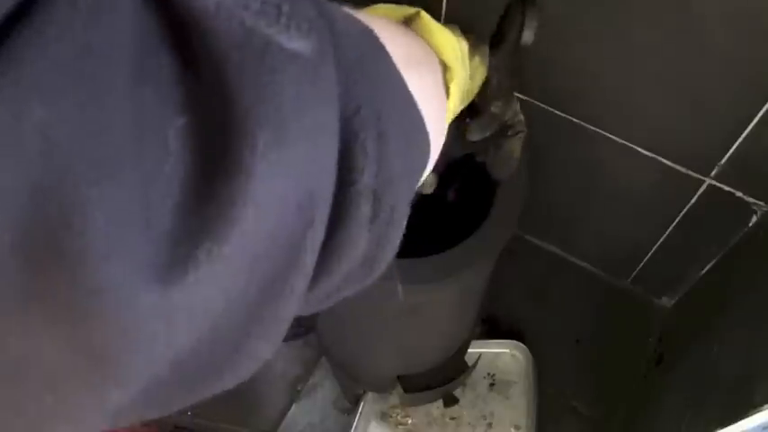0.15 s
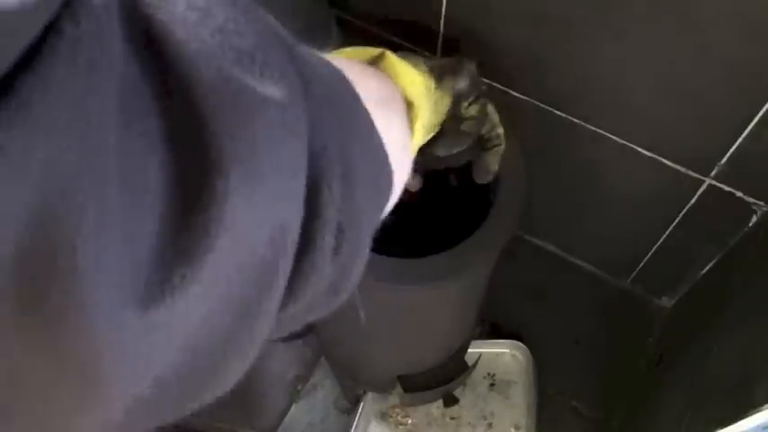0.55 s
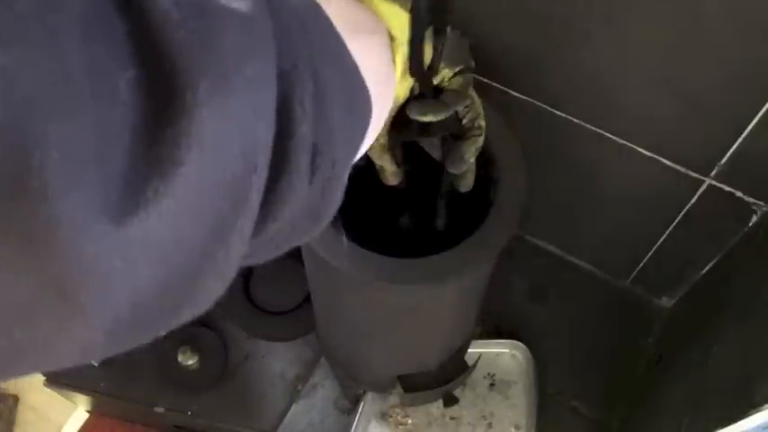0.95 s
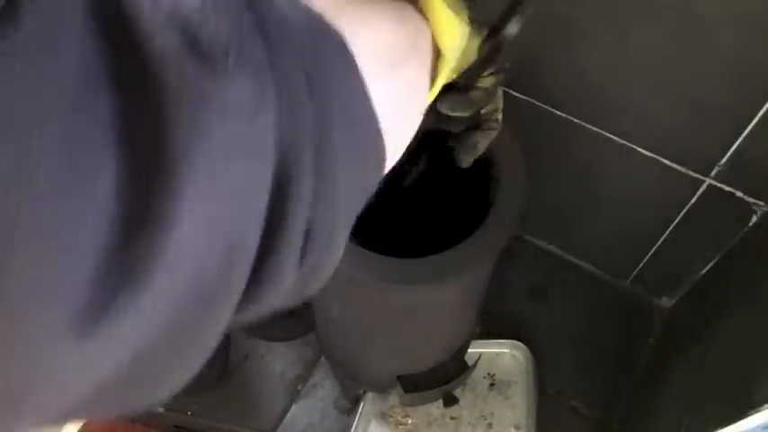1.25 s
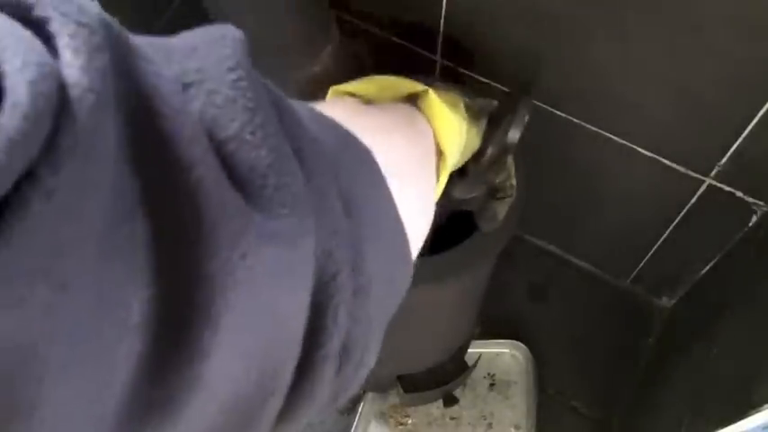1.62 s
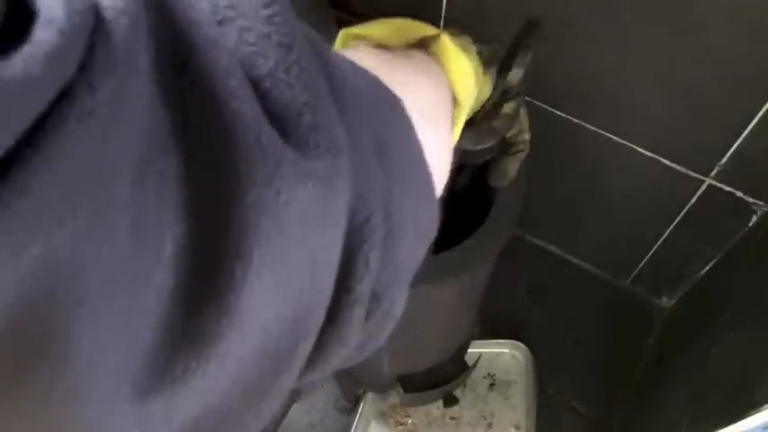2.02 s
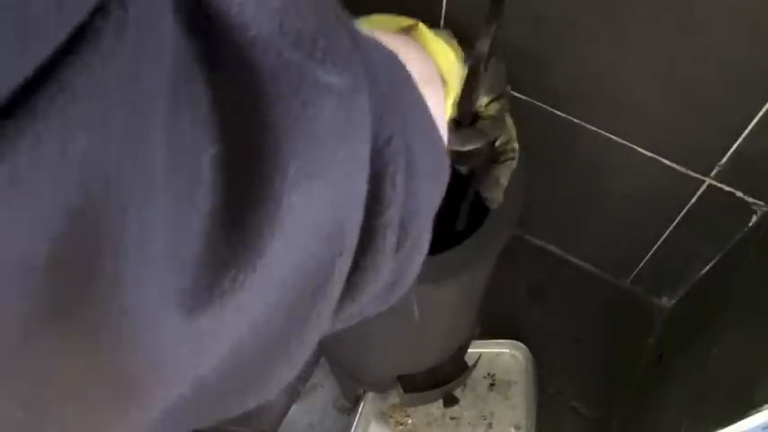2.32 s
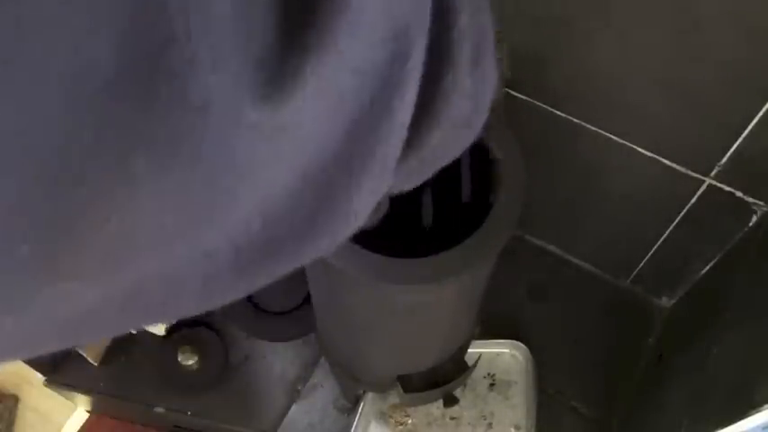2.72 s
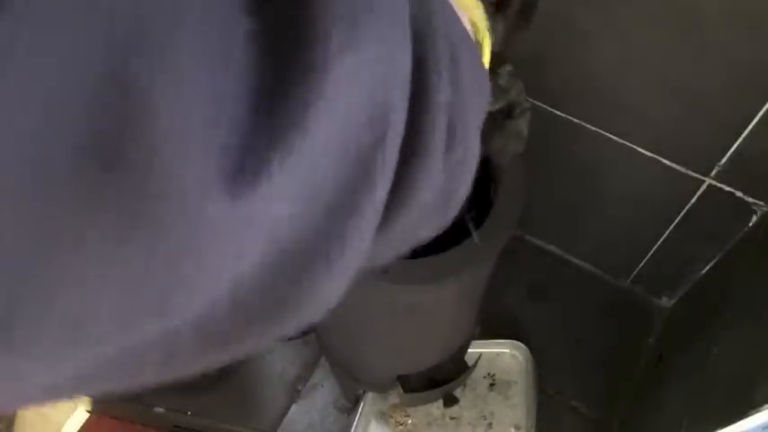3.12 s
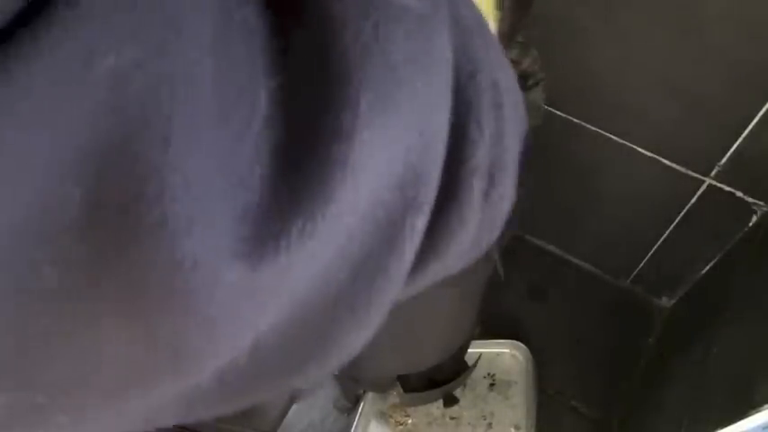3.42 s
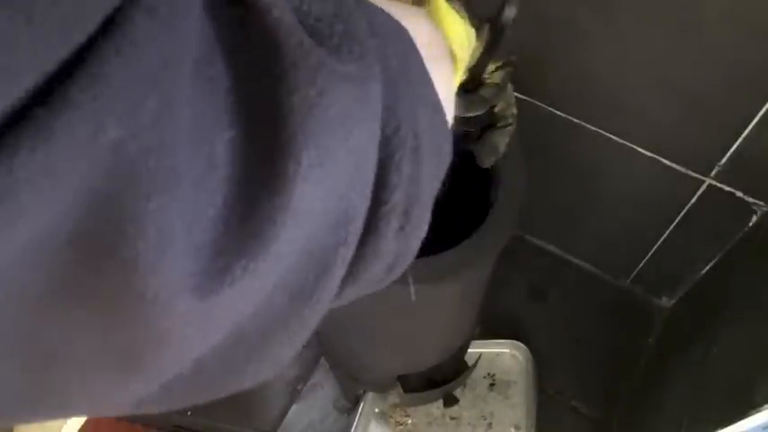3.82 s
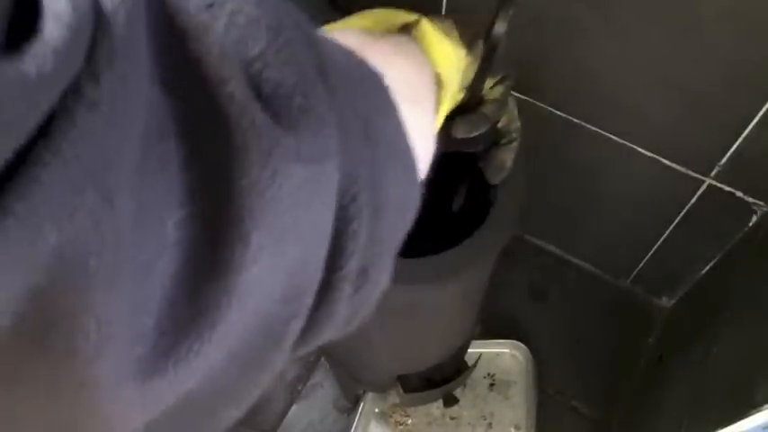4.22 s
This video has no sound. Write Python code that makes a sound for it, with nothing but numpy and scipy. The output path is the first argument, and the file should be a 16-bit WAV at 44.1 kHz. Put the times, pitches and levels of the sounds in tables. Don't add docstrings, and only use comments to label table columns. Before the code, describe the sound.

Close, dry metallic clanks and short gritty scrapes as ash is raked off a grate in a small round metal stove.

```python
import sys
import numpy as np
from scipy import signal
from scipy.fft import rfft, irfft, next_fast_len
from scipy.io import wavfile
from scipy.ndimage import uniform_filter1d, map_coordinates

SR = 44100
rng = np.random.default_rng(int(sys.argv[2]) if len(sys.argv) > 2 else 0)


def bounce(signal):
    frames = np.transpose(np.atleast_2d(signal))
    limited = np.clip(frames, -1, 1)
    pcm = np.round(limited * 32767).astype(np.int16)
    wavfile.write(sys.argv[1], SR, pcm)


def volts(x):
    e = np.asarray(x, float) / 20
    return 10 ** e


N = 192449


def unit(x):
    return x / np.sqrt(np.mean(x ** 2) + 1e-20)


def along(points, hz):
    f, v = np.transpose(points)
    return np.interp(np.log(hz + 1), np.log(f + 1), v)


def wobble(rate_hz):
    knots = rng.standard_normal(int(N * rate_hz / SR) + 4)
    return map_coordinates(knots, [np.arange(N) * rate_hz / SR])


def filtered(x, response):
    m = next_fast_len(N + SR // 2)
    return irfft(rfft(x, m) * response(np.fft.rfftfreq(m, 1 / SR)), m)[:N]


def causal(x, spectrum):
    size = 4096
    cepstrum = irfft(np.log(volts(along(spectrum, np.fft.rfftfreq(size, 1 / SR))) + 1e-6))
    cepstrum[1:size // 2] *= 2
    cepstrum[size // 2 + 1:] = 0
    kernel = irfft(np.exp(rfft(cepstrum)))
    return signal.fftconvolve(x, kernel / np.linalg.norm(kernel))[:len(x)]


def resonances(peaks):
    def response(f):
        total = 0
        for k, (hz, width_hz, db) in enumerate(peaks):
            loss = 1j * f * width_hz
            total = total + (-1) ** k * volts(db) * loss / (hz * hz - f * f + loss)
        return total
    return response


def mode_peaks(modes):
    return [(hz, 8.3 / t60_s, db) for hz, db, t60_s in modes]


def gritty(size, spiky_db):
    return unit(rng.standard_normal(size) * volts(spiky_db * np.minimum(rng.exponential(size=size), 3)))


def ringing(modes, t, scatter_db):
    hz, db, t60_s = np.transpose(modes)[:, :, None]
    strength, grip, detune = rng.standard_normal((3, len(modes), 1))
    t60_s = t60_s * np.exp(0.034 * grip)
    fade = volts(db + scatter_db * np.minimum(strength, .6) - 60 * t / t60_s)
    tones = fade * np.sin(2 * np.pi * hz * (1 + 0.0017 * detune) * t)
    return np.sum(tones, axis=0) * (1 - np.exp(-t / 0.00061))


# start_s, peak_db, grate_db (re peak), brightness_db, wash_db
BLOW_EVENTS = [(0.0212, -10, -29, -48, -1.5), (0.055, -1.5, -29, -23, -8), (0.1653, -5, -22, -16.5, -6),
               (0.3002, -37.5, -1, -27, -3), (0.4284, -50, 14, -13, -11), (0.5265, 3, -26.5, -23, -6.5),
               (0.8582, -23, -28, -0.5, -21), (1.2631, -1.5, -22.5, -13, -0.5),
               (1.3163, -10.5, -13.5, -22, 2), (1.427, -10.5, -17, -83, 0), (1.623, -5, -19.5, -2.5, -2.5),
               (1.86, -34.5, 4, -19, -12), (2.1101, -8, -14, -65, -1), (2.207, -3, -20, -4, -4.5),
               (2.3043, -7.5, -19, -19, 0), (2.3338, -12, -14.5, -28, 4), (2.724, -19.5, -0.5, -42, 0),
               (2.7442, -2, -17.5, -16.5, -4.5), (2.8344, -17.5, -3.5, -49, 5.5),
               (2.8596, -24.5, -8, -40, 6), (3.5726, 2, -25, -7.5, -9), (3.7752, -17.5, -11.5, -18, 4.5),
               (4.0781, -30, -9, -18, 0.5), (4.3246, -15.5, -17, -4.5, -5)]
# start_s, peak_db, grate_db (re peak)
CATCH_EVENTS = [(0.1361, -29.5, 2), (0.5891, -14, -11), (0.623, -9, -41), (0.6574, -13.5, -21),
                (0.7116, -24, -22), (0.9445, -26, -24), (0.9657, -11.5, -18), (1.0201, -16, -21),
                (1.1815, -22.5, -8), (1.732, -21, -10.5), (1.7395, -22.5, -17), (1.8002, -22, -20),
                (1.8751, -37, -2), (1.926, -25.5, -38), (2.0026, -16.5, -15), (2.3795, -17.5, -3.5),
                (2.4396, -25.5, -20), (2.5577, -34.5, -23.5), (3.0307, -37, -4), (3.1268, -31, 3.5),
                (3.2367, -22, -10.5), (3.2844, -32, -3.5), (3.6494, -29, -3), (3.6901, -20, -5),
                (3.7305, -23.5, -12), (3.8544, -31, 4), (3.8791, -27, 0)]
# start_s, level_db
TICK_EVENTS = [(0.0561, 3.5), (0.1662, 1), (0.5277, 6), (0.5323, 2.5), (.635, -5.5), (0.688, -10),
               (.726, -6), (2.1136, -5), (2.337, -4.5), (2.3852, -8.5), (2.3955, -14), (3.082, -26),
               (1.2668, 3.5), (1.2879, -6), (1.3217, -7), (1.6234, 1), (2.7485, -4.5), (2.7508, 0.5),
               (2.754, 0), (3.5762, 4.5), (3.5783, 1), (3.583, -1)]
# pitch_hz, level_db, t60_s
GRATE_MODES = [(724, 3.5, 0.28), (758, -5, 0.72), (795, -3.5, 0.33), (1037, -6, 0.37), (1042, -1.5, 0.13),
               (1201, -5.5, 0.39), (1364, -20, 0.26), (1432, -6, 0.62), (1517, 0.5, 0.26), (1526, -1, 0.28),
               (1753, -1, 0.27), (1900, -3.5, 0.31)]
# pitch_hz, level_db, t60_s
TONG_MODES = [(1900, -20, 0.5), (2175, -4.5, 0.39), (2608, 1.5, 0.19), (2700, -1.5, 0.14),
              (2832, -0.5, 0.22), (3000, -17, 0.36), (3172, -0.5, 0.22), (3400, -1, 0.23),
              (3575, -9.5, 0.28), (3974, 1, 0.13), (4100, 0, 0.16), (4380, -7, 0.081), (4410, -39, 0.145),
              (4780, -9, 0.04), (5000, -18.5, 0.63), (5410, -3, 0.11), (5300, -7, 0.14),
              (6450, -21.5, 0.26), (7100, -4, 0.18)]
# freq_hz, density_db_per_hz
CRACK_SPECTRUM = [(300, -120), (1000, -87), (2000, -1.5), (3200, 9.5), (4600, 7.5), (6000, 2.5),
                  (9000, -16.5), (16000, -44.5)]
# freq_hz, density_db_per_hz
EDGE_SPECTRUM = [(2500, -19), (5000, -1), (7000, -0.5), (10000, -5.5), (13000, -11.5), (16000, -38)]
# freq_hz, density_db_per_hz
RASP_SPECTRUM = [(300, -7.5), (650, -6.5), (1050, -1), (1600, 6), (2300, -5), (4000, -70)]


def knocks():
    blow_rise, catch_rise = 0.15, 0.9
    catch_bright_db, catch_wash_db = -0.5, -0.8
    chatter_s, grate_s_per_db, dull_s_per_db = 0.012, 0.00019, 0.00014
    t = np.arange(SR // 2) / SR
    crack, edge, rasp, ring, loose = np.zeros((5, N + SR))
    contacts = [(*row, blow_rise) for row in BLOW_EVENTS]
    contacts += [(*row, catch_bright_db, catch_wash_db, catch_rise) for row in CATCH_EVENTS]
    for start_s, db, grate_db, bright_db, wash_db, rise in sorted(contacts):
        start = round(start_s * SR)
        at = slice(start, start + len(t))
        decay_s = max((chatter_s + grate_s_per_db * grate_db - dull_s_per_db * bright_db) / 3, .0005)
        burst = gritty(len(t), spiky_db=2.5) * np.exp(-t / decay_s) * (1 - np.exp(-t / (rise * decay_s)))
        burst[30] += 0.032 / decay_s ** 0.65 * blow_rise / rise
        crack[at] += volts(db - 10.5) * burst
        edge[at] += volts(db + bright_db - 3.5) * burst
        rasp[at] += volts(db + grate_db + 0.5) * burst
        ring[at] += volts(db + grate_db - 12.5) * ringing(GRATE_MODES, t, scatter_db=4.5)
        ring[at] += volts(db + wash_db - 23.5) * ringing(TONG_MODES, t, scatter_db=1.5)
        loose[at] = volts(wash_db)
    for start_s, db in TICK_EVENTS:
        start = round(start_s * SR)
        crack[start] += volts(db)
        edge[start] += volts(db - 11.5)
        rasp[start] += volts(db - 10.5)
    hard = causal(crack, CRACK_SPECTRUM) + causal(edge, EDGE_SPECTRUM) + causal(rasp, RASP_SPECTRUM)
    hard = hard[:N]
    return hard + ring[:N] * volts(2.0 * wobble(35) - 4.0) + corner(hard * loose[:N])


def cinders(low_hz, octaves, count, size):
    when, pitch, life, luck = rng.random((count, 4)).T[:, :, None]
    t, hz = np.arange(size) / SR, low_hz * 2 ** (octaves * pitch)
    envelope = np.exp(-t * hz / (4 + 12 * life)) * (1 - np.exp(-t * hz / 2.0))
    tones = volts(-5 * np.log(luck + 0.13)) * np.sin(2 * np.pi * hz * t) * envelope
    where = (when * N).astype(int) + np.arange(size)
    return unit(np.bincount(where.ravel(), tones.ravel(), N + size)[:N])


# time_s, pressure_db, drum_reach_db
RAKE_CURVE = [(0.0, -30, 0.5), (0.08, -42.5, -7), (0.58, -59, 6), (0.66, -37, -3), (1.12, -49.5, 7.5),
              (1.57, -72, 4.5), (1.8, -42, -1.5), (2.1, -70, 20), (2.25, -40.5, -2), (2.49, -63.5, 16.5),
              (2.68, -59, -7.5), (2.97, -54.5, 3.5), (3.199, -51.5, 13), (3.36, -61.5, 9),
              (3.585, -67, -9.5), (3.66, -44, 4.5), (4.08, -63.5, 11.5), (4.36, -68.5, -6)]
# centre_s, added_db, half_length_s, shove_db (against the bars)
STROKE_EVENTS = [(0.189, 0, 0.016, 5), (0.636, 6.5, 0.031, 8), (0.762, 17.5, 0.066, -4.5),
                 (1, 13, 0.019, -3), (1.064, 15.5, 0.031, 0.5), (1.665, 11, 0.058, 10),
                 (1.896, 8, 0.024, 7), (2.384, 16, 0.088, 9), (2.857, 8, 0.08, 16), (3.086, 9.5, 0.06, 0),
                 (3.718, 8.5, 0.11, -0.5), (3.846, 6.5, 0.081, 6.5), (4.337, 16, 0.015, 30.5),
                 (0.027, -1, 0.028, 0.5), (0.274, -1.5, 0.033, -2.2), (0.822, -3, 0.024, 4.7),
                 (0.956, 4, 0.018, -10), (1.165, 6, 0.054, -4.5), (1.83, 5, 0.016, -5),
                 (3.048, 4.5, 0.028, 2.5), (3.144, 4.5, 0.032, 1), (3.218, -4, 0.019, -6),
                 (3.274, 3, 0.02, 2.5)]
# freq_hz, density_db_per_hz
GRIT_SPECTRUM = [(400, -9.5), (800, -6), (1300, -2.5), (1900, 1.5), (5390, -1.5), (7960, -7),
                 (11500, -12.5), (15700, -28.5), (16400, -102)]
# pitch_hz, width_hz, level_db
DRUM_PEAKS = [(148, 25, -49), (252, 68, -2.5), (293, 23, -3.5), (313.4, 20, 2.5), (364, 30, -1.5),
              (459, 84, -9)]
# freq_hz, density_db_per_hz
RUMBLE_SPECTRUM = [(47, -36), (80, -5), (140, 0.5), (200, -4.5), (260, -53.5), (440, -120)]


def raking():
    t = np.arange(N) / SR
    time_s, press_points_db, reach_points_db = np.transpose(RAKE_CURVE)
    press_db = np.interp(t, time_s, press_points_db)
    reach_db = np.interp(t, time_s, reach_points_db)
    dig_db, shove_db = np.zeros((2, N))
    for centre_s, db, half_s, push_db in STROKE_EVENTS:
        stroke = np.exp(-((t - centre_s) / half_s) ** 2)
        dig_db += db * stroke
        shove_db += push_db * stroke
    grit_db = press_db + dig_db
    rasp_db = grit_db - 0.18 * reach_db + shove_db
    drum_db = press_db + reach_db + 0.88 * shove_db
    rumble_db = press_db + 0.4 * reach_db + 1.48 * shove_db - 3

    slips_db = .5 * wobble(14) + 2.2 * wobble(60)
    tips = volts(grit_db) * unit(volts(slips_db + 1.5 * wobble(29.77)) * gritty(N, spiky_db=4.5))
    bar_slips_db = slips_db + 1.6 * wobble(25.63)
    bars = volts(rasp_db) * unit(volts(bar_slips_db) * gritty(N, spiky_db=6.5))
    shell = volts(drum_db) * unit(volts(0.92 * slips_db + 4.1 * wobble(20)) * rng.standard_normal(N))
    hands = volts(rumble_db) * unit(volts(2.6 * wobble(8.83)) * rng.standard_normal(N))

    coarse = cinders(low_hz=1365, octaves=2.5, count=2500, size=600)
    fine = cinders(low_hz=3458, octaves=2.1, count=900, size=300)
    clinker = volts(grit_db - 16 + slips_db) * coarse
    clinker += volts(0.27 * grit_db - 1.5) * causal(tips, EDGE_SPECTRUM)
    clinker += volts(grit_db + 0.2 * dig_db - 13 + 2.14 * slips_db) * fine
    steel = clinker + causal(tips, GRIT_SPECTRUM)
    steel += volts(5.5) * filtered(tips, resonances(mode_peaks(TONG_MODES)))
    iron = volts(rasp_db - 11 + slips_db) * cinders(low_hz=454.0, octaves=2.1, count=900, size=1500)
    iron += volts(-7.5) * causal(bars, RASP_SPECTRUM)
    iron += volts(16.0) * filtered(bars, resonances(mode_peaks(GRATE_MODES)))
    drum = volts(25.5) * filtered(shell, resonances(DRUM_PEAKS))
    return steel + iron + drum + causal(hands, RUMBLE_SPECTRUM)


# start_s, peak_db, pitch_hz
BOOM_EVENTS = [(0.0, -18, 327), (0.134, -29, 321.6), (0.17, -23.5, 322), (0.394, -37, 366),
               (0.432, -15, 323.6), (0.529, -31, 268), (0.639, -11.5, 333.5), (0.723, -20, 305),
               (0.817, -19.5, 322), (1.04, -26.5, 326), (1.073, -24.5, 327), (1.179, -26, 316),
               (1.224, -28.5, 320), (3.655, -33, 312), (1.434, -33.5, 279), (1.632, -22, 315),
               (1.807, -24, 330), (2.004, -21.5, 309), (2.21, -16.5, 261.5), (2.379, -24, 279),
               (2.496, -28.5, 334), (2.732, -25.5, 294.5), (2.852, -14, 293), (3.074, -29.5, 353),
               (3.178, -20.5, 342), (3.689, -24, 332), (3.778, -11.5, 334), (3.877, -27, 264),
               (4.101, -33.5, 338), (4.333, -2, 306), (0.449, -26.5, 332), (0.646, -23, 151),
               (.745, -20, 307), (.965, -33, 298), (.995, -37, 311), (1.136, -29.5, 330), (1.27, -32, 284),
               (1.66, -32, 111), (1.78, -34, 321), (1.88, -35, 262), (2.115, -32, 301), (2.15, -32, 293),
               (2.21, -31.5, 142), (2.385, -29, 437), (2.431, -38, 302), (2.87, -25.5, 127),
               (3.25, -32.5, 298), (3.66, -28, 148), (3.797, -25, 335), (3.11, -31, 332), (3.135, -27, 339),
               (3.29, -32, 325)]


def booms():
    hard_t60_s, longer_s_per_db = 0.021, 0.0029
    hold = 1.222
    out, t = np.zeros(N + SR), np.arange(SR // 4) / SR
    for start_s, db, hz in BOOM_EVENTS:
        t60_s = max(hard_t60_s - longer_s_per_db * db, .03)
        phase = 2 * np.pi * hz * t
        swing = np.sin(phase) + 0.29 * np.sin(0.796 * phase) + 0.11 * np.sin(1.2 * phase)
        rise = 1 - np.exp(-(t / 0.0057) ** 2)
        start = max(round((start_s - .006) * SR), 0)
        out[start:start + len(t)] += volts(db + 2.5 - 60 * (t / t60_s) ** hold) * rise * swing
    return out[:N]


# start_s,
# pitch_hz, level_db, t60_s
PING_EVENTS = [(.17, 3300, -41, 1), (.303, 1800, -41, 0.22), (.527, 2175, -32.5, 0.62),
               (.527, 1530, -23, 0.15), (.77, 1045, -30, 0.66), (1.31, 1058, -31.5, 0.27),
               (1.355, 1074, -37, .3), (1.265, 1364, -28.5, 0.58), (1.265, 1480, -16, 0.031),
               (1.316, 3172, -33.5, 0.42), (1.44, 1056, -29.5, 0.35), (1.428, 4380, -24.5, 0.063),
               (1.66, 3295, -39, 0.79), (1.875, 3530, -32.5, 0.12), (2.002, 4390, -30, 0.15),
               (2.002, 1520, -37, 0.34), (2.112, 1514, -26.5, 0.28), (2.112, 2220, -29.5, 0.27),
               (2.112, 3910, -27, 0.12), (2.38, 2740, -34.5, 0.62), (2.38, 3495, -27, 0.2),
               (2.744, 2143, -34, 0.41), (2.737, 758, -20, 0.1), (2.85, 1547, -24, 0.26),
               (3.236, 5830, -35.5, 0.21), (3.573, 2175, -29.5, 0.62), (3.775, 4140, -18, 0.037),
               (3.88, 1068, -24, 0.094), (4.078, 3575, -33.5, 0.15), (4.078, 2700, -45, 0.94),
               (4.078, 2832, -38.5, 0.23), (3.58, 1420, -33.5, 0.14), (3.58, 1560, -38, 0.32),
               (3.575, 2570, -24, 0.11), (2.004, 3905, -34, 0.23), (2.04, 3340, -48, 0.25),
               (2.112, 3400, -21, 0.042), (2.75, 1037, -43, 0.33), (2.84, 1045, -26.5, 0.097),
               (1.265, 1090, -19, 0.079), (1.27, 3260, -28.5, 0.16), (2.861, 2580, -29.5, 0.1),
               (3.04, 1090, -41.5, .15), (3.071, 1923, -44, .2), (3.155, 2110, -36, .08),
               (3.95, 4100, -58, 0.32), (4.08, 5000, -52, 0.17), (.79, 2510, -27, 0.13),
               (3.271, 1034, -44, 0.18),
               (.857, 4100, -40, .18), (1.317, 4780, -36, 0.23), (1.428, 743, -40.5, 0.76),
                 (1.797, 768, -30, 0.12), (1.862, 1042, -30, 0.16), (1.315, 1364, -25.5, 0.36),
                 (2.38, 773, -29, 0.23), (1.862, 748, -26, 0.099), (1.875, 2720, -43, 0.45),
                 (2.002, 6430, -22.5, 0.02), (2.49, 1420, -54, 1.5), (3.29, 1927, -50.5, 1.5),
                 (3.285, 6450, -44, 0.2), (3.29, 5200, -52, 0.42), (3.573, 702, -42, 0.53),
                 (3.731, 4140, -30, 0.035), (3.855, 5200, -45, .3), (4.08, 995, -31, 0.04),
                 (4.1, 1745, -52, .3), (.17, 4145, -37, 0.47), (.18, 3630, -39.5, 0.51),
                 (.2, 1915, -41.5, 0.48), (.305, 760, -37, 0.19), (.33, 1912, -49.5, 0.82),
                 (.429, 1566, -43, 0.18), (.432, 1096, -44, 0.22), (1.7, 1925, -37, 0.36),
                 (2.003, 1127, -41, 0.49), (2.002, 7200, -41, 0.18), (2.112, 5300, -50, 0.16),
                 (3.861, 1950, -59, 0.66), (.17, 7600, -39, 0.25), (0.169, 6800, -29.5, 0.2),
                 (0.057, 4460, -14, .018), (0.061, 7440, -32.5, 0.2), (0.661, 1540, -36, 0.14),
                 (1.265, 2175, -44, .44), (1.265, 1527, -28, 0.76), (1.264, 1680, -18, 0.05),
                 (1.319, 5580, -37, 0.23), (1.431, 1690, -26, 0.1), (1.43, 5550, -42, 0.16),
                 (2.731, 2600, -20, 0.13), (2.772, 2143, -37, 0.23), (2.725, 1543, -25, 0.088),
                 (3.061, 4110, -42, 0.087), (3.089, 2694, -38.5, 0.17), (3.13, 1576, -38, 0.47),
                 (3.24, 3300, -43.5, 0.21), (2.385, 721, -27.5, 0.21), (.65, 702, -26, 0.11),
               (0.166, 4000, -14, 0.025), (.298, 1330, -37, .04), (.634, 3500, -22, 0.021),
                (.712, 3360, -27, .05), (0.748, 1527, -25, 0.25), (.757, 3300, -27, 0.044),
                (.766, 4360, -25, .04), (.772, 11300, -21, 0.034), (.857, 3310, -28.5, 0.066),
                (0.859, 5300, -38, 0.058), (.966, 4340, -38, 0.036), (0.971, 3300, -40, 0.11),
                (0.98, 4200, -25, .03), (.985, 1720, -33, 0.096), (1.021, 3320, -29.5, 0.039),
                (1.046, 748, -25.5, 0.11), (1.075, 2550, -49, 0.14), (1.739, 3400, -32, 0.041),
                (1.74, 5070, -44, 0.038), (1.794, 1060, -30, 0.067), (1.889, 3495, -28, .05),
                (1.91, 5000, -40, 0.028), (1.927, 4020, -32, .03), (1.927, 5000, -33, 0.026),
                (2.093, 6500, -44, 0.034), (2.207, 4400, -20, 0.031), (2.309, 2557, -28.5, 0.26),
                (2.345, 2560, -22.5, 0.13), (2.374, 1037, -17.5, 0.11), (2.4, 2175, -35, 0.17),
                (3.661, 1916, -29.5, 0.11), (3.66, 727, -32, 0.24), (3.691, 4380, -24.5, 0.023),
                (3.69, 7100, -42, 0.13), (3.774, 3570, -30, 0.053), (3.785, 1568, -28.5, 0.15),
                (3.785, 725, -28, 0.14), (3.853, 1216, -31, 0.12), (3.874, 723, -23.5, 0.25)]


def pings():
    wander, choke_db_per_s, onset_cycles = 0.0015, 250, 1.65
    twin_apart, twin_share = .022, 0.21
    out, t = np.zeros(N + SR), np.arange(SR // 2) / SR
    waver = np.tile(wobble(40), 2)
    blows_s = np.array([row[0] for row in BLOW_EVENTS] + [N / SR])
    for k, (start_s, hz, db, t60_s) in enumerate(PING_EVENTS):
        start = round(start_s * SR)
        own = waver[(start + k * SR // 7) % N:][:len(t)]
        phase = 2 * np.pi * hz * (t + wander * np.cumsum(own[::-1]) / SR)
        tone = np.sin(phase) + twin_share * np.sin(phase * (1 + twin_apart))
        choke_db = 0
        if start_s < 4.3:
            next_blow_s = blows_s[blows_s > start_s + .03][0]
            choke_db = choke_db_per_s * np.maximum(start_s + t - next_blow_s, 0)
        fade = volts(db + 2.7 * own - 60 * t / t60_s - 450 * t * t - choke_db)
        out[start:][:len(t)] += fade * tone * (1 - np.exp(-t * hz / onset_cycles))
    return out[:N]


# freq_hz, t60_s
CORNER_DECAY = [(300, 0.28), (1500, 0.26), (5000, 0.19), (12000, 0.15)]


def corner(x):
    out, size = np.zeros(N + SR), 4096
    for start in range(0, N, size):
        hz, t, z = signal.stft(rng.standard_normal(SR // 3), SR, nperseg=128)
        fade = volts(-60 * t / along(CORNER_DECAY, hz)[:, None])
        tail = signal.istft(z * fade, SR, nperseg=128)[1]
        wet = signal.fftconvolve(x[start:start + size], tail / np.linalg.norm(tail))
        out[start:start + len(wet)] += wet
    return out[:N]


# time_s, level_db
SWAY_CURVE = [(0.0, -42), (0.29, -55), (0.93, -45.5), (1.36, -59.5), (2.32, -46), (3.34, -49), (3.48, -63),
              (3.699, -42.5), (4.07, -53), (4.36, -55)]
# freq_hz, density_db_per_hz
SUBSONIC_SPECTRUM = [(8.8, -33), (15, 2), (48, 9), (80, -0.5), (100, -46.5), (180, -120)]


def phone_sway():
    level_db = np.interp(np.arange(N) / SR, *np.transpose(SWAY_CURVE))
    return volts(level_db + 0.46 * wobble(2.2)) * causal(rng.standard_normal(N), SUBSONIC_SPECTRUM)


# freq_hz, density_db_per_hz
HUSH_SPECTRUM = [(59, -27), (100, 10.5), (1440, -11.5), (1740, -20.5), (2400, -21.5), (4650, -12),
                 (5870, -20), (6260, -4), (7590, -9.5), (14700, -5.5), (16400, -34)]


def room_hush():
    return volts(-62.0) * causal(rng.standard_normal(N), HUSH_SPECTRUM)


def scene():
    body = pings() + booms() + raking()
    return (knocks() + body + volts(-9.5) * corner(body) + phone_sway() + room_hush())[None]


# freq_hz, width_hz, depth_0_to_1
PORT_NOTCHES = [(8020, 414, 0.91), (11800, 100, 0)]


def microphone(x):
    def response(f):
        gain = 1 / (1 + (f / 15600) ** 40)
        for hz, width_hz, depth in PORT_NOTCHES:
            gain = gain * (1 - np.clip(depth, 0, 1) / (1 + ((f - hz) / width_hz * 2) ** 2))
        return gain
    tamed = x / (1 + np.abs(x / .85) ** 4) ** .25
    return filtered(tamed, response)


def treble_dropouts(x, from_hz, top_hz):
    hz, t, z = signal.stft(x, SR, nperseg=512)
    field = uniform_filter1d(rng.standard_normal(z.shape), size=3, axis=0)
    field = unit(uniform_filter1d(field, size=11, axis=1))
    loudness = np.log10(np.sum(np.abs(z) ** 2, axis=0) + 1e-9)
    busy = np.clip(uniform_filter1d(loudness, size=11) / 3 + 2.2, .45, 1.1)
    need = 2.4 * busy * np.clip((hz[:, None] - from_hz) / 2200, 0, 1) + 1.2 * (hz[:, None] > top_hz)
    keep = np.clip((field + 2.6 - need) * 5, .01, 1)
    return signal.istft(z * np.where(need > 0, keep, 1), SR, nperseg=512)[1][:N]


def band_limit(x):
    return signal.sosfilt(signal.butter(12, 16500, fs=SR, output="sos"), x)


def record(dry):
    heard = microphone(dry[0])
    mix = treble_dropouts(heard, from_hz=8500, top_hz=15200)[None]
    return band_limit(mix)


dry = scene()
out = record(dry)
bounce(out)
```